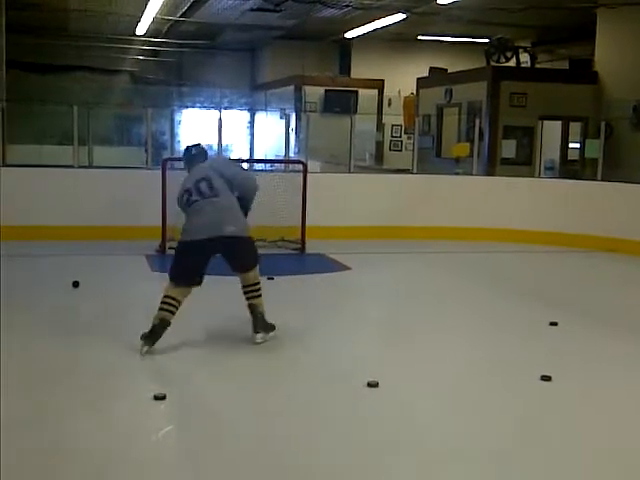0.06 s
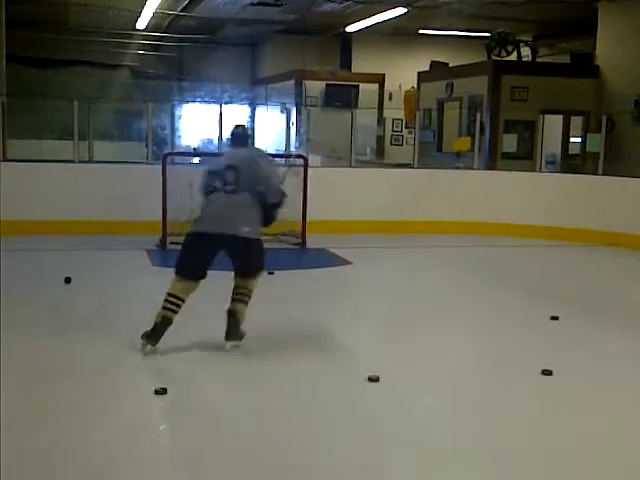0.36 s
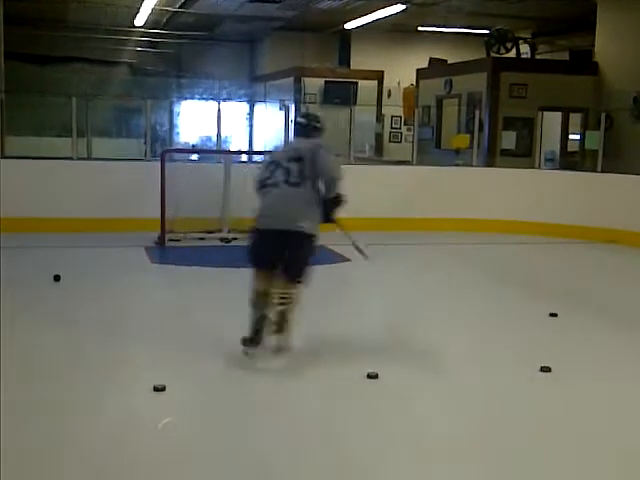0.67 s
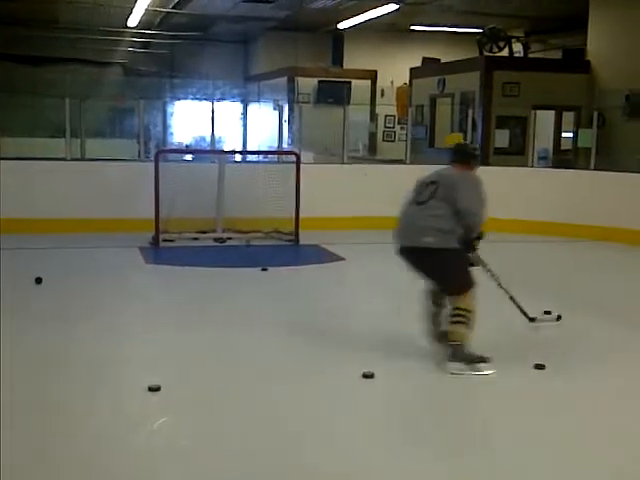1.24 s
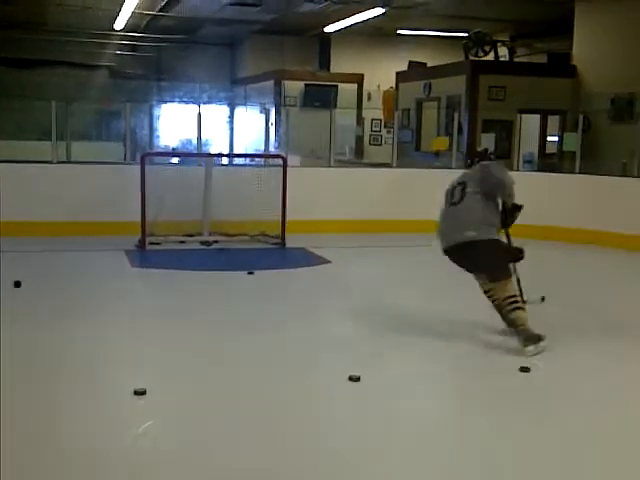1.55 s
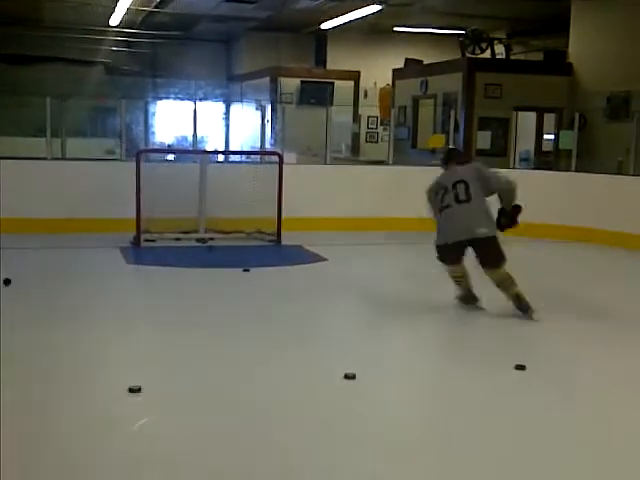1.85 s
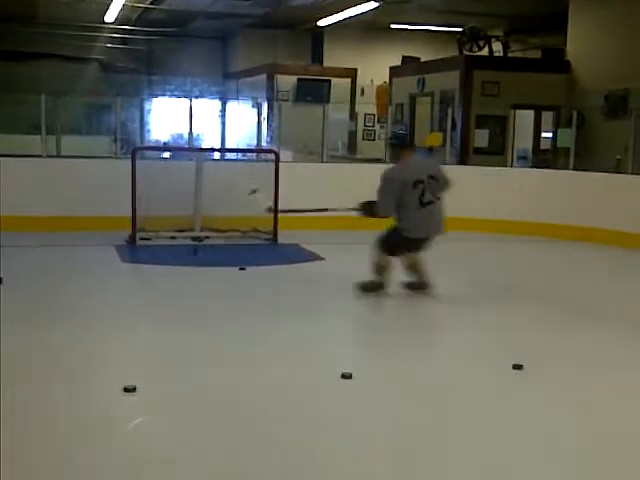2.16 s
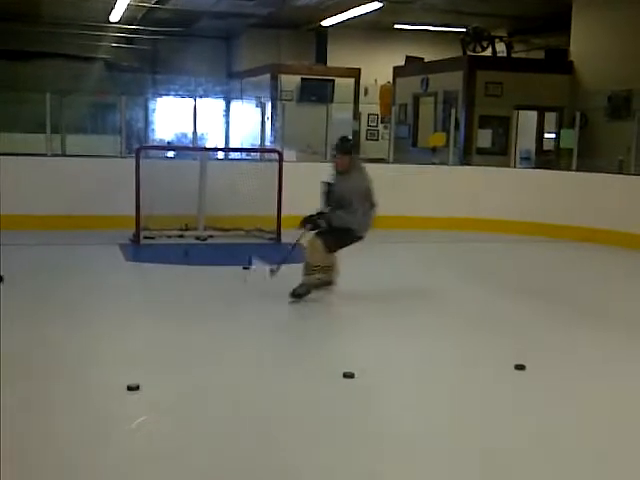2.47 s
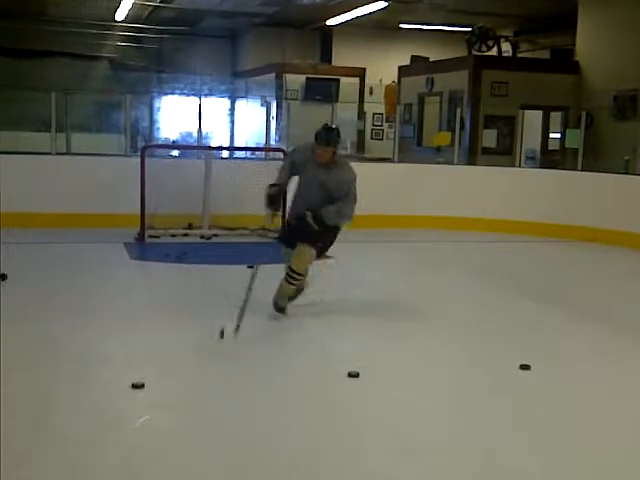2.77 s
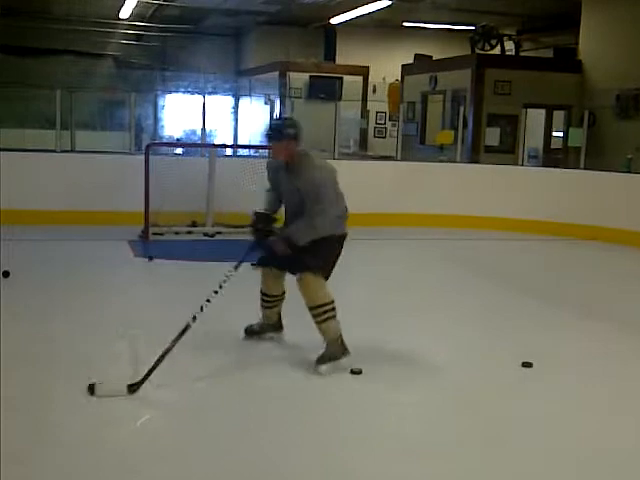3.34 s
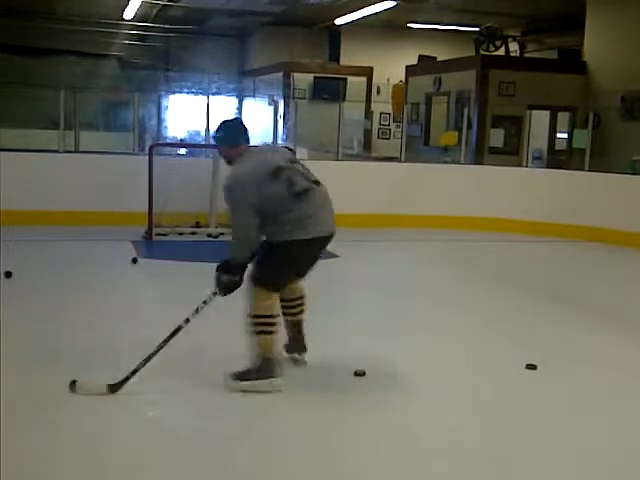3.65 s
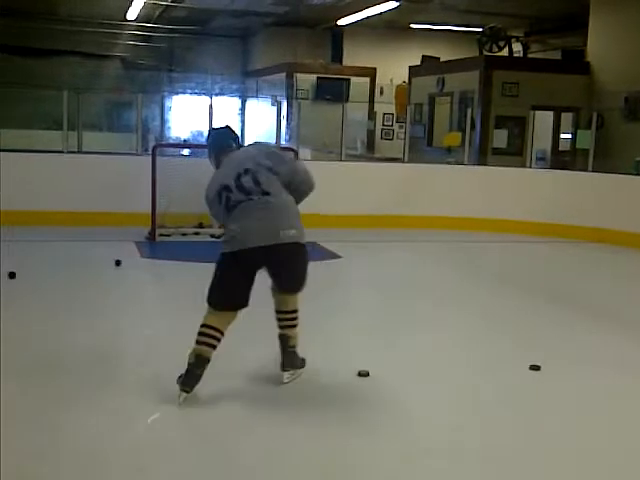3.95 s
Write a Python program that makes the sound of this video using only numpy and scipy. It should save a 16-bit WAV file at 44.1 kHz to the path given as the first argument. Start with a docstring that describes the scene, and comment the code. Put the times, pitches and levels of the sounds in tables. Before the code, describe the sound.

A hockey stick clicks against a puck as skates scrape across an echoing indoor rink. A puck booms off the far boards, then come more taps, a cracking shot and a sharp final clack, heard from the ice over humming ventilation.

```python
"""A stick clicks and skates scrape in a small, echoing indoor rink; then a puck booms off the far end boards.
One microphone sits on the ice while a lone hockey player taps another puck along and slaps it into
the net, blades shaving the ice through the turns. The rink glass returns each tap at once, the hall
rings for about two seconds, and ventilation hums underneath."""
import sys
import numpy as np
from scipy import signal
from scipy.fft import rfft, irfft, next_fast_len
from scipy.io import wavfile
from scipy.ndimage import uniform_filter1d

SR = 44100
rng = np.random.default_rng(int(sys.argv[2]) if len(sys.argv) > 2 else 0)


def wav_record(signal):
    """Record a signal, one row per channel, as 16-bit PCM in the file named by sys.argv[1]."""
    frames = np.transpose(np.atleast_2d(signal))
    bounded = np.clip(frames, -1, 1)
    # unit amplitude maps onto the largest positive 16-bit level
    quanta = np.round(bounded * 32767).astype(np.int16)
    wavfile.write(sys.argv[1], SR, quanta)


N = 4 * SR


def amp(db):
    """Decibels to gain."""
    return 10 ** (np.asarray(db) / 20)


def unit(x):
    """Scale to rms 1."""
    return x / np.sqrt(np.mean(x ** 2) + 1e-20)


def fade(t, t60_s):
    """Exponential decay, 60 dB down at t60_s."""
    return amp(-60 * t / t60_s)


def along(points, hz):
    """Read (freq_hz, value) points on a log frequency axis."""
    freqs, values = np.transpose(points)
    return np.interp(np.log(hz + 1), np.log(freqs + 1), values)


def octaves(hz, centre_hz=1000):
    """Distance in octaves from a centre."""
    return np.log2((hz + 1) / centre_hz)


def coloured(x, curve):
    """Filter x through a dB curve of frequency."""
    size = next_fast_len(len(x) + 8192)
    gain = amp(curve(np.fft.rfftfreq(size, 1 / SR)))
    return irfft(rfft(x, size) * gain, size)[:len(x)]


def click(curve, size=2048):
    """A minimum-phase pulse of peak 1, shaped by a dB curve."""
    cepstrum = irfft(np.log(amp(curve(np.fft.rfftfreq(size, 1 / SR)))))
    cepstrum[1:size // 2] *= 2
    cepstrum[size // 2 + 1:] = 0
    pulse = irfft(np.exp(rfft(cepstrum)))
    return pulse / np.abs(pulse).max()


def add(track, start_s, x):
    """Mix x into the track at start_s."""
    i = round(start_s * SR)
    x = x[max(-i, 0):max(N - i, 0)]
    track[max(i, 0):][:len(x)] += x


def grit(curve, count, chip_share=0, chips_per_s=1100):
    """Coloured noise of rms 1, with a share of its power in tiny ice-chip clicks."""
    chips = (rng.random(count) < chips_per_s / SR) * rng.standard_normal(count)
    hiss = rng.standard_normal(count)
    return unit(coloured(np.sqrt(chip_share) * unit(chips) + np.sqrt(1 - chip_share) * hiss, curve))


# The hall's ring, heard from the ice: freq_hz, t60_s
HALL_T60 = [(80, 0.44), (250, 2.85), (1000, 1.95), (2500, 2.16), (5000, 3.08), (7500, 0.74)]


def hall_decay(hz, t, gap_s=0.0045):
    """A gap, dense echoes off the nearby boards, then the hall's long tail; energy 1 near 1 kHz."""
    tail = fade(t, along(HALL_T60, hz)[:, None])
    early_lift = 1 + amp(3.5) * fade(t, t60_s=0.068)
    onset = np.clip(t / gap_s - 1, 0, 1)
    decay = tail * early_lift * onset
    return decay / np.linalg.norm(decay[np.searchsorted(hz, 1000)])


def hall_echoes(x, hall_db):
    """The diffuse echoes of x, without its direct sound."""
    hz, t, spectra = signal.stft(rng.standard_normal(3 * SR), SR, nperseg=256)
    tail = signal.istft(spectra * hall_decay(hz, t), SR, nperseg=256)[1] / np.sqrt(t[1] * SR)
    return amp(hall_db) * signal.fftconvolve(x, tail)


def noise_in_hall(envelope, curve, hall_db, chip_share):
    """Noise that follows an envelope, with the diffuse sound it builds up in the hall."""
    hz, t, spectra = signal.stft(grit(curve, 3 * SR), SR, nperseg=256)
    frame_power = uniform_filter1d(envelope ** 2, 128)[::128]
    hall_power = signal.fftconvolve(frame_power[None], hall_decay(hz, t) ** 2, axes=1)[:, :len(t)]
    out = amp(hall_db) * signal.istft(spectra * np.sqrt(np.abs(hall_power)), SR, nperseg=256)[1]
    out[:len(envelope)] += envelope * grit(curve, len(envelope), chip_share)
    return out


def blow(curve, t60_s, hall_db, chip_share=0, attack_s=0.00073):
    """An impact that rises quickly and dies away in the hall as coloured noise."""
    t = np.arange(SR) / SR
    envelope = fade(t, t60_s) * (1 - np.exp(-t / attack_s))
    return noise_in_hall(envelope, curve, hall_db, chip_share)


# Ventilation air, all around the microphone: freq_hz, gain_db
VENT_SPECTRUM = [(20, -37.5), (60, -23.5), (110, -21), (170, -20), (280, -7.5), (430, -6.5), (600, -9.5),
                 (1400, -7.5), (2400, -13.5), (3800, -23.5), (7300, -51)]


def room_tone(hum_hz=123.5, note_hz=425):
    """Ventilation air, mains hum and a faint, wavering note that fades in the hall."""
    t = np.arange(N) / SR
    air = amp(-39) * grit(lambda hz: along(VENT_SPECTRUM, hz), N)
    hum = amp(-59) * np.sqrt(2) * np.sin(2 * np.pi * hum_hz * t)
    out = air + hum
    waver_hz = 4 * unit(coloured(rng.standard_normal(N), lambda hz: -np.minimum(hz, 120)))
    note = np.sin(2 * np.pi * np.cumsum(note_hz + waver_hz) / SR)
    envelope = fade(t, t60_s=2.2) * (1 - fade(t, t60_s=0.06))
    add(out, 0.055, amp(-37) * note * envelope)
    return out


# Blades and puck sliding across the rink: time_s, level_db
GLIDE_LEVELS = [(0, -34.5), (.8, -38), (1.3, -33.5), (1.65, -34.5), (2.3, -35.5), (2.8, -50.5),
                (3.2, -34.5), (3.6, -45.5), (4, -32)]
# Their hiss at the microphone: freq_hz, gain_db
GLIDE_SPECTRUM = [(60, -53.5), (150, -29), (300, -17), (480, -14), (750, -4), (1000, -7.5), (1400, -4),
                  (1950, -12), (2400, -22), (7300, -50)]


def glide():
    """Blades and puck rub over the ice in an unbroken, grainy hiss."""
    level_db = np.interp(np.arange(N) / SR, *np.transpose(GLIDE_LEVELS))
    return amp(level_db) * grit(lambda hz: along(GLIDE_SPECTRUM, hz), N, chip_share=0.35)


# Skate strokes out on the ice: start_s, rise_s, release_s, level_db, tilt_db_per_octave, hall_db
SKATE_STROKES = [(-.2, 0.27, 0.11, -42.5, 3.5, 11.5), (.02, 0.05, 0.2, -31.5, -3.8, 5.5),
                 (0.951, 0.054, 0.18, -55, -18, -5.5), (1.42, 0.11, .2, -34, -3.5, -16),
                 (1.95, 0.13, 0.57, -37.5, -5, 5.5), (2.42, 0.051, 0.45, -34, -3.5, -6.5),
                 (2.97, 0.013, 0.16, -34.5, -5, 2), (3.14, 0.31, 0.49, -30.5, 0, 2),
                 (3.8, 0.12, 0.11, -31, -1.5, -3), (3.96, 0.022, .15, -29, 1, 7.5)]
# An edge shaving ice: freq_hz, gain_db
SCRAPE_SPECTRUM = [(50, -55.5), (120, -23.5), (340, -20.5), (600, -13.5), (900, -5.5), (1500, -2),
                   (2300, -9.5), (3400, -12), (5000, -23), (7300, -31.5)]


def skates():
    """An edge bites ever harder, shaves off chips of ice and lets go."""
    out, t = np.zeros(N), np.arange(SR) / SR
    for start_s, rise_s, release_s, level_db, tilt, hall_db in SKATE_STROKES:
        bite = np.minimum(t / rise_s, 1) ** 1.6
        release = np.clip(1 - (t - rise_s) / release_s, 0, 1) ** 2
        colour = lambda hz: along(SCRAPE_SPECTRUM, hz) + tilt * octaves(hz)
        scrape = noise_in_hall(bite * release, colour, hall_db, chip_share=0.21)
        add(out, start_s, amp(level_db) * scrape)
    return out


# Boards, goal, skates and puck thudding around the rink: start_s, level_db, pitch_hz, t60_s
RINK_THUDS = [(.357, -20.5, 202, 0.15), (.745, -41, 208.8, 0.1), (0.954, -37.5, 201, 0.19),
              (1.858, -42, 170, .3), (2.18, -41, 129.4, 0.95), (2.239, -49, 86.7, .9),
              (2.34, -29, 328, 0.28), (2.859, -41.5, 408, 0.19), (3.763, -35, 254, 0.056),
              (3.9414, -16.5, 304, 0.013)]


def thuds(width_octaves=0.39, skirt_db_per_octave=4):
    """Soft blows, each with one broad low resonance; the longer ones also start more gently."""
    out = np.zeros(N)
    for start_s, level_db, pitch_hz, t60_s in RINK_THUDS:
        resonance = lambda hz: -10 * np.log10(1 + (octaves(hz, pitch_hz) / width_octaves) ** 4)
        skirt = lambda hz: skirt_db_per_octave * np.maximum(np.abs(octaves(hz, pitch_hz)) - 1, 0)
        thud = blow(lambda hz: resonance(hz) - skirt(hz), t60_s, hall_db=0, attack_s=0.019 * t60_s)
        add(out, start_s, amp(level_db) * thud)
    return out


# At the far end, the puck hits the boards and the panel knocks back: start_s, level_db
BOARD_KNOCKS = [(0.3637, -17.5), (0.374, -12.5), (.401, -18.5), (0.449, -23.5), (.565, -20.5)]
# Each knock, heard from down the rink: freq_hz, gain_db
BOARD_SPECTRUM = [(30, -41), (70, -25), (130, -5.5), (200, -7.5), (320, -4), (520, -4), (800, 0.5),
                  (1300, -0.5), (2000, -14), (4300, -25), (7300, -45.5)]
# The panel's resonances: pitch_hz, level_db, t60_s
PANEL_MODES = [(172, -36, 1.1), (207, -27, 1.1), (263, -27, 1.2), (375, -34, 1.6), (522, -30, 1.7),
               (829, -29, 1.9), (1024, -26, 1.9), (1296, -27, 1.9)]


def end_boards():
    """Struck by a puck, the far boards boom, rattle and ring on."""
    out, t = np.zeros(N), np.arange(2 * SR) / SR
    for start_s, level_db in BOARD_KNOCKS:
        knock = blow(lambda hz: along(BOARD_SPECTRUM, hz), t60_s=0.12, hall_db=5.5, attack_s=0.0037)
        add(out, start_s, amp(level_db) * knock)
    ring = sum(amp(level_db) * fade(t, t60_s) * np.sin(2 * np.pi * (pitch_hz * t + rng.random()))
               for pitch_hz, level_db, t60_s in PANEL_MODES)
    swell = 1 - fade(t, t60_s=0.07)
    add(out, BOARD_KNOCKS[0][0], ring * swell)
    return out


# The cracks of one shot, heard mostly through the hall: start_s, level_db, t60_s, tilt_db_per_octave
SHOT_CRACKS = [(1.7579, -21.5, 0.054, -1), (1.8228, -14.5, .025, 0), (1.832, -19.5, 0.06, 0),
               (1.856, -23, 0.072, -2), (1.892, -20.5, 0.075, -1)]
# Each crack at the microphone: freq_hz, gain_db
CRACK_SPECTRUM = [(40, -38), (110, -34), (230, -9), (390, -5.5), (600, -1), (850, 1), (1300, 3), (2400, -5),
                  (4500, -15.5), (7300, -34.5)]


def slap_shot():
    """The stick blade meets the ice, then the puck, and whips through in a run of gritty cracks."""
    out = np.zeros(N)
    for start_s, level_db, t60_s, tilt in SHOT_CRACKS:
        colour = lambda hz: along(CRACK_SPECTRUM, hz) + tilt * octaves(hz)
        add(out, start_s, amp(level_db) * blow(colour, t60_s, hall_db=9, chip_share=0.59))
    return out


def glass_echo(tap, dull_db_per_octave=6.5):
    """The rink glass scatters a tap in time and dulls it above 1600 Hz."""
    scatter = rng.standard_normal(1024) * fade(np.arange(1024) / SR, t60_s=0.01)
    smeared = np.convolve(tap, scatter / np.linalg.norm(scatter))
    return coloured(smeared, lambda hz: -dull_db_per_octave * np.maximum(octaves(hz, 1600), 0))


# Stick on puck or ice, in the foreground:
# start_s, level_db, ring_hz, ring_db, edge_hz, drop_db, echo_delay_s, echo_db, hall_db
STICK_TAPS = [(0.06, -15, 1295, -5, 3500, 11, 0.012, -16, -8),
              (.748, -14.5, 910, 2.5, 1600, 15, 0.009, -4, -4.5),
              (1.035, -25, 2400, 16.5, 3200, 10, 0.012, -10, -9),
              (1.144, -9.5, 2490, 10.5, 2700, 30, .0104, -4.5, -1.5),
              (1.321, -20, 784, 8, 1940, 20, 0.0059, -6, 0),
              (1.3893, -12, 1640, 12.5, 3290, 4.5, .0100, -4, 1.5),
              (1.52, -13.5, 945, 5.5, 2600, 17, 0.012, -9, 2),
              (2.954, -13.5, 830, 12.5, 2100, 13, 0.013, -4.5, 10),
              (2.9805, -17.5, 796, 16, 2000, 18, .015, -1, -8),
              (3.154, -34, 790, 4.5, 2050, 11.5, 0.016, -10, -8),
              (3.9091, -22, 1300, 16, 3000, 12.5, 0.031, -14, 8),
              (3.9434, -3, 800, 6.5, 1870, 9, 0.011, -23, 1.5),
              (3.9552, -20, 5200, 15, 6500, 8, .01, -4, 4),
              (3.9874, -9, 1880, 15.5, 3600, 11, 0.025, -7, -33)]
# The stick blade's knock: freq_hz, gain_db
BLADE_SPECTRUM = [(40, -27.5), (150, -17.5), (350, -3.5), (800, 6), (1700, 1.5), (2300, -10.5),
                  (3200, -4.5), (5000, -14.5), (7500, -35)]


def stick_taps(ring_octaves=0.2, edge_octaves=0.32):
    """Dry clicks with a brief blade ring, echoed by glass and hall; a low treble edge is a soft contact."""
    out = np.zeros(N)
    for start_s, level_db, ring_hz, ring_db, edge_hz, drop_db, delay_s, echo_db, hall_db in STICK_TAPS:
        treble_loss = lambda hz: drop_db * np.clip(octaves(hz, edge_hz) / edge_octaves, 0, 1)
        body = lambda hz: along(BLADE_SPECTRUM, hz) - treble_loss(hz)
        ring = lambda hz: ring_db / (1 + (octaves(hz, ring_hz) / ring_octaves) ** 2)
        tap = -amp(level_db) * click(lambda hz: body(hz) + ring(hz))
        add(out, start_s, tap)
        add(out, start_s + delay_s, amp(echo_db) * glass_echo(tap))
        hall_tap = click(lambda hz: body(hz) + 0.35 * ring(hz))  # less blade ring in the hall
        add(out, start_s, hall_echoes(hall_tap, level_db + hall_db))
    return out


def scene():
    """The whole rink at one microphone on the ice."""
    impacts = stick_taps() + end_boards() + slap_shot() + thuds()
    return (impacts + glide() + skates() + room_tone())[None]


# A small camera's microphone, nearly flat until the treble droops: freq_hz, gain_db
MIC_RESPONSE = [(20, -0.5), (70, -0.5), (6300, 0.5), (7000, -3), (7500, -11.5)]


def record(dry, top_hz=7480):
    """The camera hears in mono and cuts off steeply above top_hz."""
    cutoff = lambda hz: 100 * np.clip((hz - top_hz) / 700, 0, 1)
    return coloured(dry[0], lambda hz: along(MIC_RESPONSE, hz) - cutoff(hz))[None]


dry = scene()
out = record(dry)
wav_record(out)
```